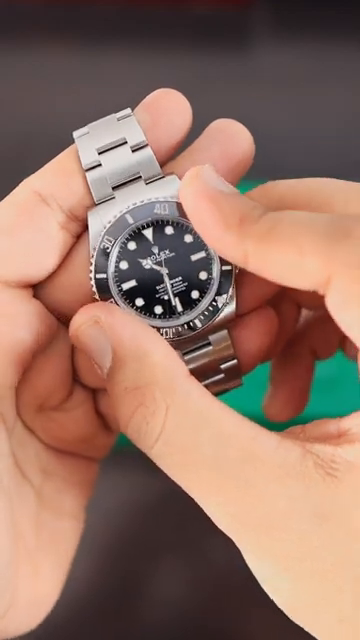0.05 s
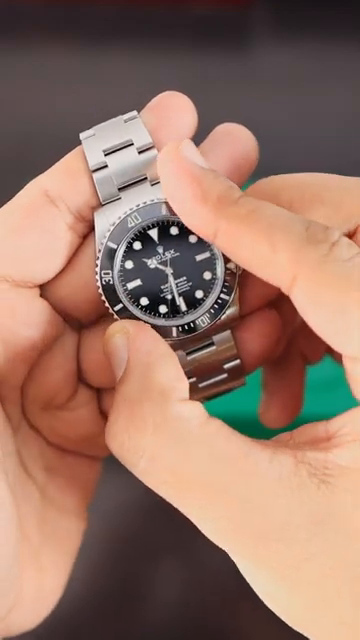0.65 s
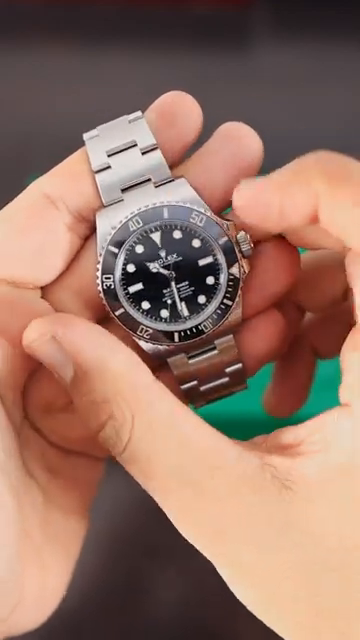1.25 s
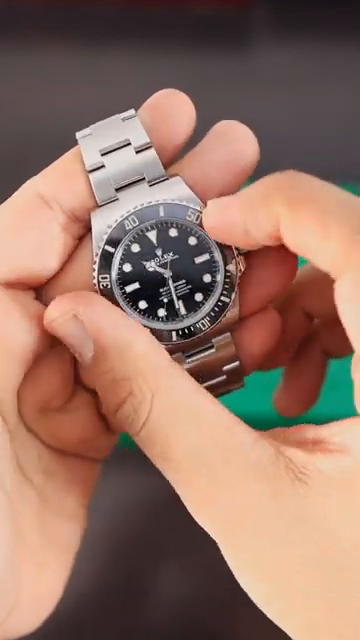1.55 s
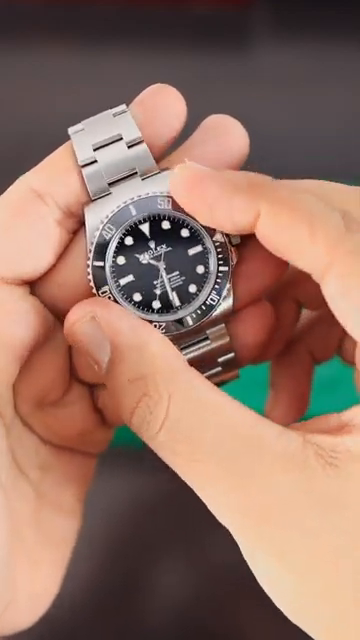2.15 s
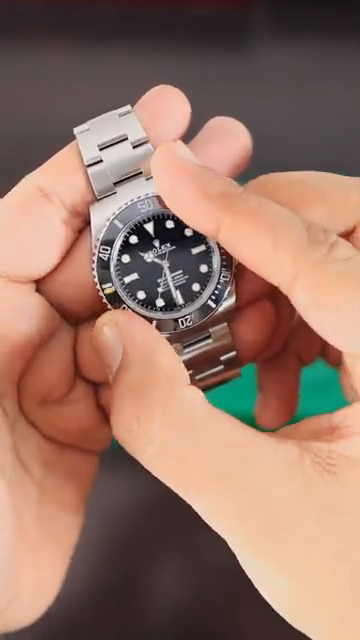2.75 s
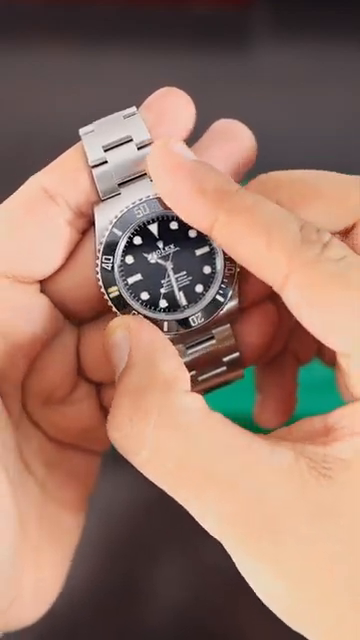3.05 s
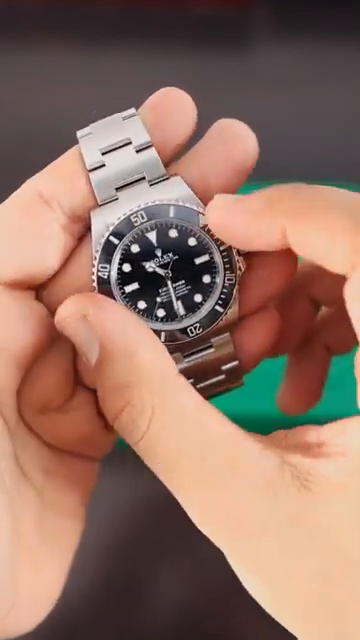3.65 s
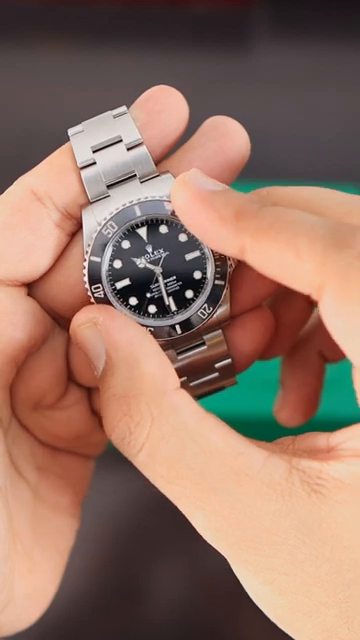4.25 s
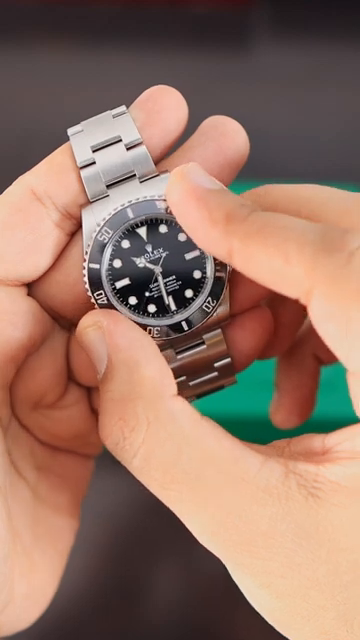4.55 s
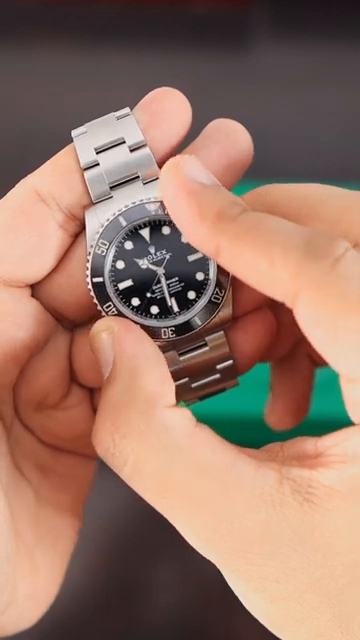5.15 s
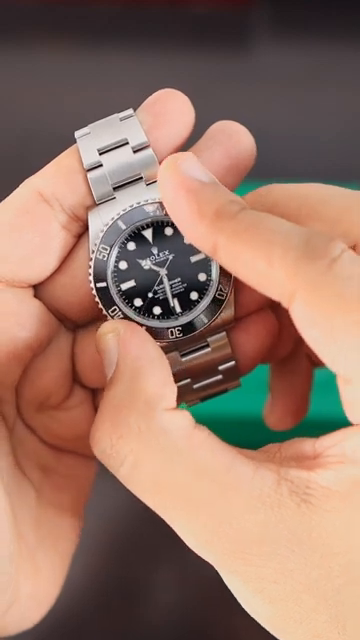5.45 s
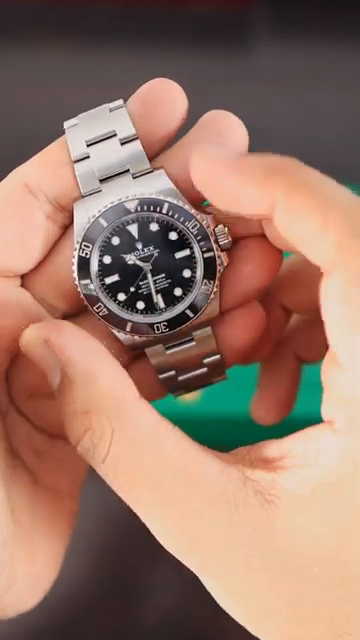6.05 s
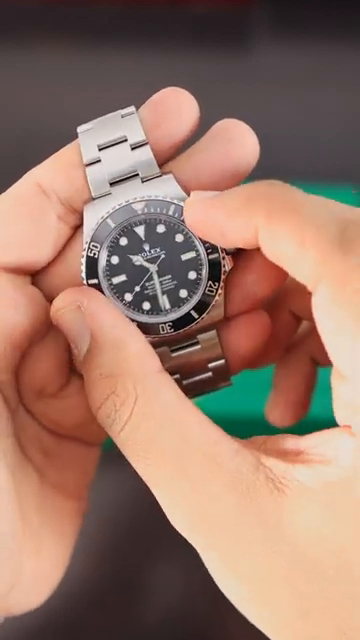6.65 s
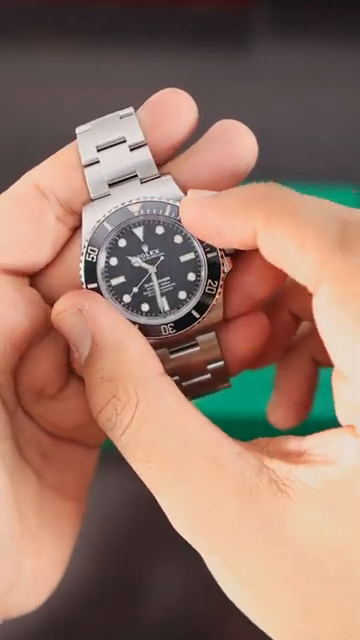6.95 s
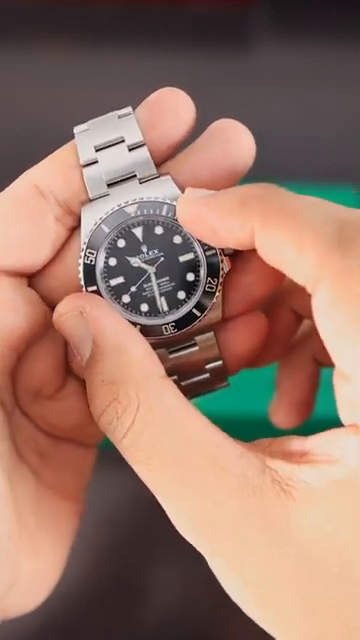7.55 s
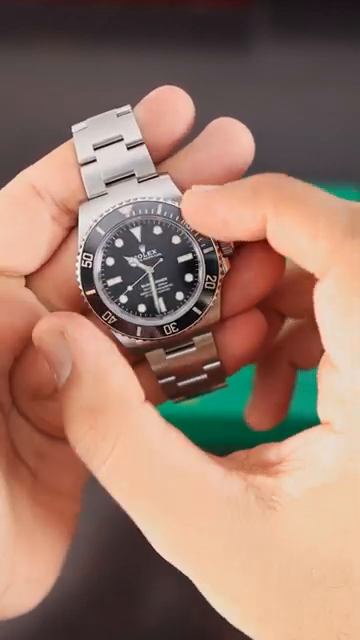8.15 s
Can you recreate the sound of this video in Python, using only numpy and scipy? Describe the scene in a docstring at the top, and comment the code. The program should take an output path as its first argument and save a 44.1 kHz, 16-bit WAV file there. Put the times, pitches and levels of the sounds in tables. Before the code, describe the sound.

The steel bezel of a wristwatch is turned by hand close to the microphone, each step a bright, crisp, slightly ringing click. A quick run of about a dozen clicks lasts from the start to 0.7 seconds, with soft hand bumps and a dull, distant scrape at about 0.6 seconds. After a pause, a second run goes from 1.8 to 3.1 seconds. A third begins fast at 4 seconds and slows until it stops at 5.7 seconds. Three single clicks follow at about 6.9, 7.4 and 7.9 seconds, with a fainter scrape near 7.2 seconds. The hands bump softly in the pauses. The clicks carry a short small-room reverberation, and a faint low rumble, hiss and appliance hum continue throughout.

```python
"""Bright, ringing clicks come in three quick runs, then three single steps: the steel bezel of a
wristwatch is turned by hand, close by. Each time its pawl drops off a tooth, the impact excites the
hand-damped modes of the case, and the sound scatters off hands and table into a small room.
The hands bump softly; twice a dull, distant scrape sounds and dies away.
Behind it all the room rumbles, hisses and hums faintly."""
import sys
import numpy as np
from scipy.fft import rfft, irfft, next_fast_len
from scipy.io import wavfile
from scipy.ndimage import map_coordinates

SR = 44100
rng = np.random.default_rng(int(sys.argv[2]) if len(sys.argv) > 2 else 0)


def store_wav(level_fs):
    """Save 16-bit WAV to argv[1]."""
    pcm = np.round(np.clip(np.atleast_2d(level_fs), -1, 1) * 32767)
    wavfile.write(sys.argv[1], SR, pcm.T.astype(np.int16))


N = 366897

# modes of bezel and case: f/Hz, nominal width/Hz, relative level/dB
CASE_MODES = [(2086, 200, -15), (2920, 165, -11), (3350, 220, -12.5), (3560, 256, -8), (3916, 140, -4),
              (4360, 190, -2.5), (4693, 206, 1.5), (5074, 180, 1), (5170, 130, 0), (5720, 330, -2.5),
              (5850, 160, 0), (6400, 74, 1), (6630, 163, -1), (7505, 190, 4), (7830, 270, 5.5),
              (8130, 160, 5), (8500, 220, 0), (9270, 330, 3.5), (9520, 280, 3.5), (9980, 430, 6),
              (10570, 460, 0.5), (11260, 400, -7.5), (11880, 540, 0), (12760, 250, -1), (13000, 300, -6),
              (13400, 400, -1), (14030, 150, -6), (14900, 500, -3), (15460, 450, 1.5), (15870, 840, -8)]
# the pawl drops off a tooth, one row per turn: t/s
TOOTH_TIMES = [
    [-0.021, 0.1194, 0.1914, 0.2398, 0.2865, 0.335, 0.3805, 0.4299, 0.4788, 0.5231, 0.5717, 0.6291, 0.7406],
    [1.8273, 1.8905, 1.9509, 2.0236, 2.0824, 2.1463, 2.245, 2.3365, 2.413, 2.4895, 2.5847, 2.6675, 2.7382,
     2.8055, 2.8886, 2.9837, 3.0662],
    [3.9591, 4.0192, 4.0675, 4.1059, 4.1512, 4.2302, 4.3033, 4.3755, 4.5059, 4.6513, 4.7932, 4.8978, 5.0681,
     5.273, 5.518, 5.692],
    [6.9098, 7.3954, 7.8933],
]
# grip per turn: level/dB, treble at 9, 12.5 and 15.5 kHz re 5.5 kHz/dB, drift at 9 kHz over the turn/dB
GRIPS = [(0.51, -1.5, -0.1, -1, 0.5), (-0.031, 0.5, -1.5, 2, -5), (-0.3, -0.1, 1.6, 6, -0.2),
         (-0.73, 3.5, -1.6, 10, 0.5)]
# bands that the grip colours: f/Hz
GRIP_BANDS = [5500, 9000, 12500, 15500]
# the rolling fingers let out more at 12.5 and 15.5 kHz: rise over a turn/dB
OPENING_DB = [1.5, 4.5]
# spectra of the reflections from hands and table, and from the room: f/Hz, level/dB
NEAR_SPECTRUM = [(1000, -20.5), (2600, -16.5), (3600, -11), (5200, -4.5), (6000, 3), (7000, -4.5),
                 (8000, 2), (11000, 2), (13000, 2.5), (15500, -4), (17000, -30)]
REVERB_SPECTRUM = [(1000, -52), (3000, -9.5), (4600, -0.5), (5300, 4), (6500, 3), (7000, 0.5), (8000, 1.5),
                   (10000, -1.5), (12500, -5.5), (15300, -11.5), (17000, -33)]
# bumps of the hands: t/s, level/dB, 1/e half-length/s, f/Hz
BUMPS = [(0.14, -50, 0.12, 136.7), (0.416, -44.5, .035, 74), (.66, -41, 0.055, 126.7),
         (1.206, -42.5, 0.037, 71.5), (3.419, -42.5, 0.026, 72), (4.171, -47.5, 0.077, 71.6),
         (6.138, -43.5, 0.042, 70), (7.673, -47, 0.018, 122)]
# dull, distant scrapes: t/s, level/dB, T60/s
SCRAPES = [(.55, -44.5, 0.64), (7.23, -55, 0.6)]
# spectra of the scrapes, the rumble, a low room resonance and the hiss: f/Hz, level/dB
SCRAPE_SPECTRUM = [(150, -17), (300, -0.5), (550, -3), (850, -0.5), (1050, -11.5), (1230, 0.5), (1500, -21),
                   (2000, -15), (3000, -30), (6000, -50)]
RUMBLE_SPECTRUM = [(20, -9), (45, -4), (70, 4), (100, -1), (135, -6.5), (180, -6), (220, -5.5), (320, -8),
                   (500, -19), (1000, -44)]
BOOM_SPECTRUM = [(60, -31), (105, -11.5), (128, -3.5), (150, -10.5), (250, -38), (600, -78)]
HISS_SPECTRUM = [(100, -38), (280, -6), (450, -6.5), (700, -9), (1000, -11.5), (1800, -15), (2400, -16.5),
                 (3000, -17), (7000, -20), (12500, -22.5)]
# swells of the rumble: t/s, rise/dB, 1/e half-length/s
SWELLS = [(0.56, 9, 0.36), (1.6, 4, 0.26), (2.13, 4.2, 0.14), (2.496, 4.5, 0.14)]
# appliance tones: f/Hz, rms level/dB
HUM_TONES = [(177, -67.5), (413, -74), (532, -69.5), (1475, -82.5), (1594, -78), (2304, -88.5), (2362, -80),
             (2421, -80.5)]

SNAP_DB, SAG_DB = -4.5, 1  # snaps weaken over a turn as the finger runs out of reach
NEAR_DB, REVERB_DB, SIDE_DB = -7.5, -18.5, -41  # relative to the direct snap
SHIFT_RAD_PER_S = 0.39  # the reflections change slowly as the hands shift the watch
RUMBLE_DB, BOOM_DB = -58, -63.5  # between swells
WAVER_DB, WAVER_PER_S = 0.5, 4.95


def ratchet(size=16384, lead=256):
    """Superposition: each tooth gives a snap, near reflections and reverberation, coloured by the grip."""
    out = np.zeros((2, N))
    near_a, near_b = [reflections(NEAR_SPECTRUM, t60=.042, onset=.0015, size=size) for _ in range(2)]
    room_a, room_b, room_side = [
        reflections(REVERB_SPECTRUM, t60=.33, onset=.006, size=size) for _ in range(3)]
    side = amp(SIDE_DB) * room_side
    for times, (grip_db, *treble_db, drift_db) in zip(TOOTH_TIMES, GRIPS):
        for s in times:
            travel = (s - times[0]) / (times[-1] - times[0]) - .5  # from -.5 to .5 over the turn
            gain = amp(SNAP_DB + grip_db - SAG_DB * travel)
            bands_db = np.array(treble_db) + travel * np.array([drift_db, *OPENING_DB])
            colour = list(zip(GRIP_BANDS, [0, *bands_db]))
            pose = SHIFT_RAD_PER_S * s
            near = np.cos(pose) * near_a + np.sin(pose) * near_b
            room = np.cos(3 * pose) * room_a + np.sin(3 * pose) * room_b
            direct = pawl_snap(vary_db=1.1, detune=0.0017, size=size)
            mid = direct + amp(NEAR_DB) * near + amp(REVERB_DB) * room
            stereo = np.pad([mid + side, mid - side], [(0, 0), (lead, 0)])
            add(out, s - lead / SR, gain * coloured(stereo, colour))
    return out


def pawl_snap(vary_db, detune, size):
    """Impact excitation: the case rings in its modes, which the fingers alter a little each time."""
    hz = np.fft.rfftfreq(size, 1 / SR)
    centre, width, db = np.transpose(CASE_MODES)[:, :, None]
    strength, shift = rng.standard_normal((2, len(CASE_MODES), 1))
    offset = (hz - centre * (1 + detune * shift)) / (0.6 * width)
    peaks = amp(db + vary_db * strength) / (1 + offset ** 2)
    ring = minimum_phase(np.sqrt(np.sum(peaks ** 2, axis=0)))  # the modes add in power
    return ring / np.linalg.norm(ring)


def reflections(spectrum, t60, onset, size):
    """Diffuse scattering: dense echoes of total energy 1 build up, then decay exponentially."""
    t = np.arange(size) / SR
    build_up = 1 - np.exp(-(t / onset) ** 2)
    echoes = noise(spectrum, size) * amp(-60 * t / t60) * build_up
    return echoes / np.linalg.norm(echoes)


def hand_bumps():
    """Soft contact: the hands bump in low Gaussian wave packets."""
    out, t = np.zeros(N), np.arange(N) / SR
    for s, db, length, hz in BUMPS:
        envelope = amp(db) * np.exp(-((t - s) / length) ** 2)
        out += envelope * np.sin(2 * np.pi * (hz * (t - s) + rng.random()))
    return out


def distant_scrapes():
    """Friction noise: each dull scrape swells, then decays exponentially."""
    out, t = np.zeros(N), np.arange(N) / SR
    for s, db, t60 in SCRAPES:
        age = np.maximum(t - s, 0)
        attack = 1 - np.exp(-age / 0.024)
        out += amp(db - 60 * age / t60) * attack * noise(SCRAPE_SPECTRUM, N)
    return out


def room_rumble():
    """Amplitude modulation: low noise swells and wavers; a room resonance swells 1.7 dB for each dB."""
    t = np.arange(N) / SR
    swell_db = sum(db * np.exp(-((t - s) / length) ** 2) for s, db, length in SWELLS)
    rumble = amp(RUMBLE_DB + swell_db + WAVER_DB * wobble(WAVER_PER_S)) * noise(RUMBLE_SPECTRUM, N)
    boom = amp(BOOM_DB + 1.7 * swell_db + WAVER_DB * wobble(WAVER_PER_S)) * noise(BOOM_SPECTRUM, N)
    return rumble + boom


def room_hiss(top_hz=12900):
    """Broadband noise: a steady hiss, widened slightly by a weak part in antiphase."""
    mid, side = [filtered(noise(HISS_SPECTRUM, N), lambda hz: hz < top_hz) for _ in range(2)]
    return amp(-60) * mid + amp(-80.5) * np.array([side, -side])


def appliance_hum(wander_rad=0.54):
    """Line spectrum: faint steady tones whose phases wander."""
    t = np.arange(N) / SR
    return sum(amp(db) * np.sqrt(2) * np.sin(2 * np.pi * hz * t + wander_rad * wobble(6))
               for hz, db in HUM_TONES)


def amp(db):
    """Amplitude ratio of a level in decibels."""
    return 10 ** (np.asarray(db) / 20)


def filtered(x, response):
    """Linear filtering: the spectrum of x times a frequency response."""
    n = x.shape[-1]
    padded = next_fast_len(n + 2048)
    return irfft(rfft(x, padded) * response(np.fft.rfftfreq(padded, 1 / SR)), padded)[..., :n]


def coloured(x, spectrum):
    """Spectral shaping by (f/Hz, level/dB) points, joined on a log frequency axis."""
    f, db = np.transpose(spectrum)
    return filtered(x, lambda hz: amp(np.interp(np.log(hz + 1), np.log(f + 1), db)))


def noise(spectrum, size):
    """Coloured Gaussian noise of rms 1."""
    x = coloured(rng.standard_normal(size), spectrum)
    return x / np.sqrt(np.mean(x ** 2) + 1e-20)


def wobble(rate):
    """Spline interpolation through random knots, rate of them a second."""
    knots = rng.standard_normal(int(N * rate / SR) + 4)
    return map_coordinates(knots, [np.arange(N) * rate / SR])


def minimum_phase(gain):
    """Cepstral folding: the most compact causal impulse response with this gain."""
    cepstrum = irfft(np.log(np.maximum(gain, 1e-6)))
    half = len(cepstrum) // 2
    folded = np.r_[cepstrum[0], 2 * cepstrum[1:half], np.zeros(half)]
    return irfft(np.exp(rfft(folded)))


def add(track, s, sound):
    """Superpose a sound on the track at time s, as far as the two overlap."""
    start = round(s * SR)
    sound = sound[..., max(-start, 0):]
    overlap = track[..., max(start, 0):][..., :sound.shape[-1]]
    overlap += sound[..., :overlap.shape[-1]]


def scene():
    """Sound pressures add: the watch, the hands and the quiet room."""
    return ratchet() + hand_bumps() + distant_scrapes() + room_rumble() + room_hiss() + appliance_hum()


def record(dry):
    """Band limiting: the gain falls to zero over 500 Hz around 16.6 kHz."""
    return filtered(dry, lambda hz: np.clip((16600 - hz) / 500 + .5, 0, 1))


dry = scene()
out = record(dry)
store_wav(out)
```